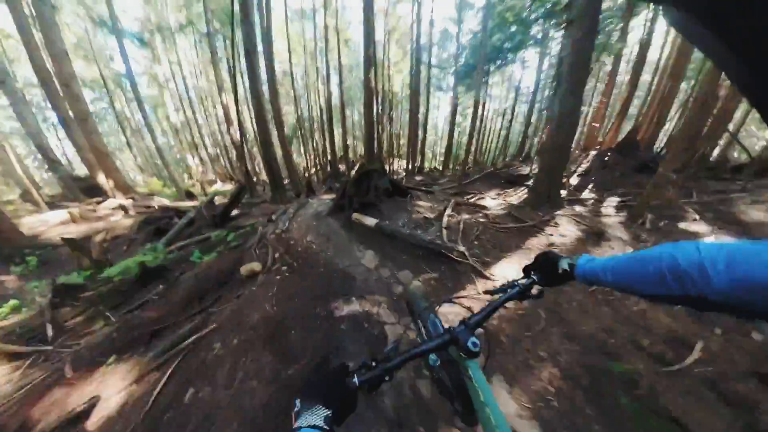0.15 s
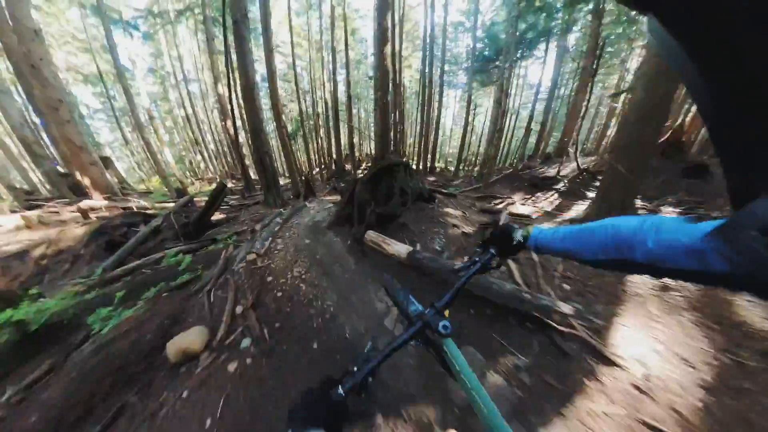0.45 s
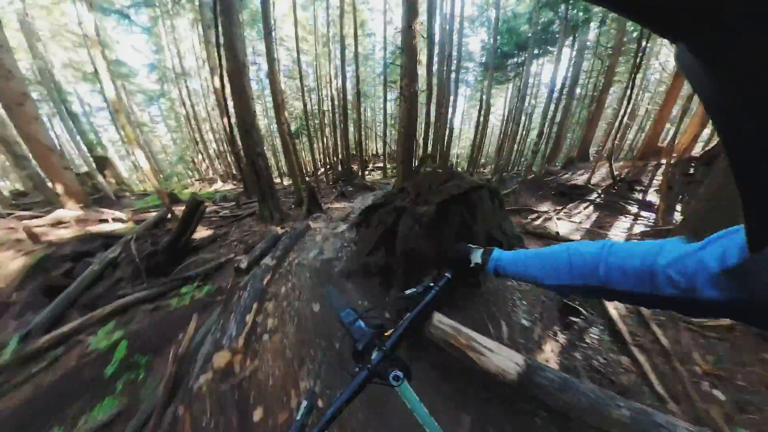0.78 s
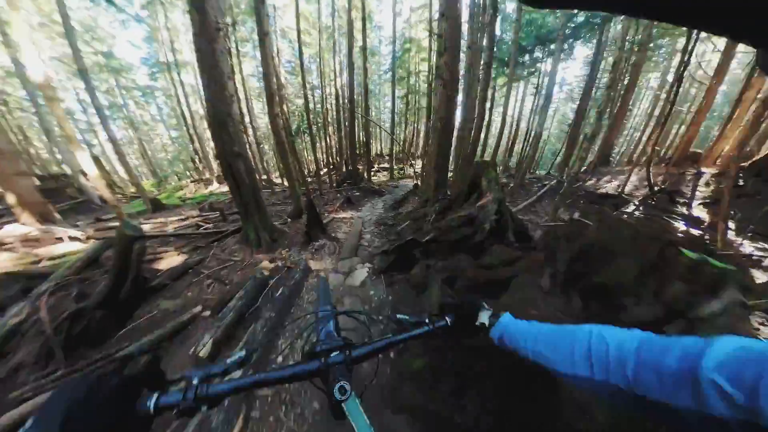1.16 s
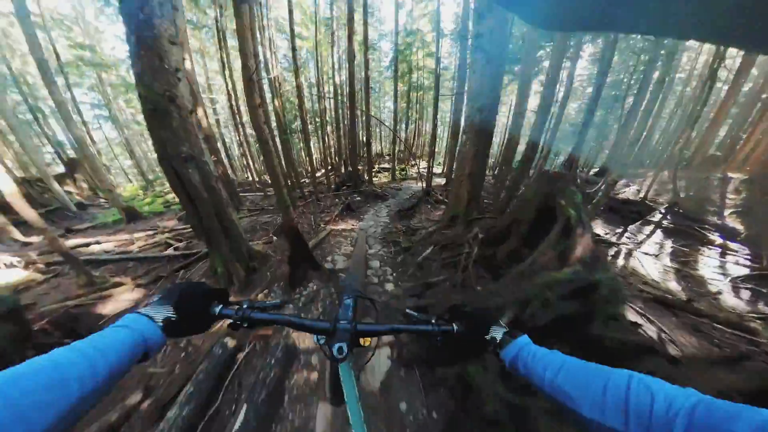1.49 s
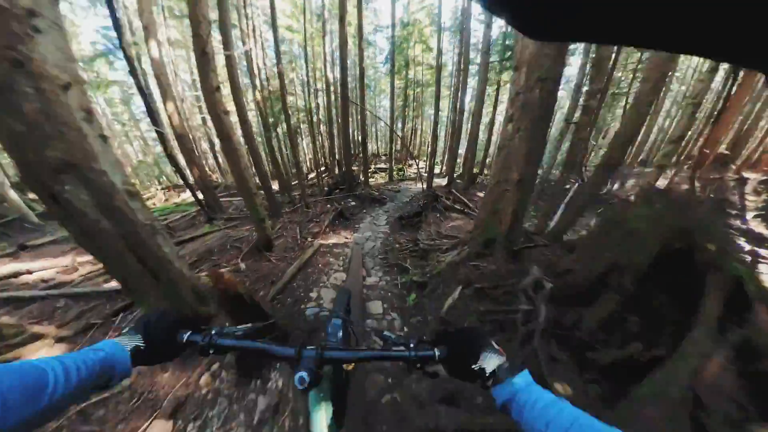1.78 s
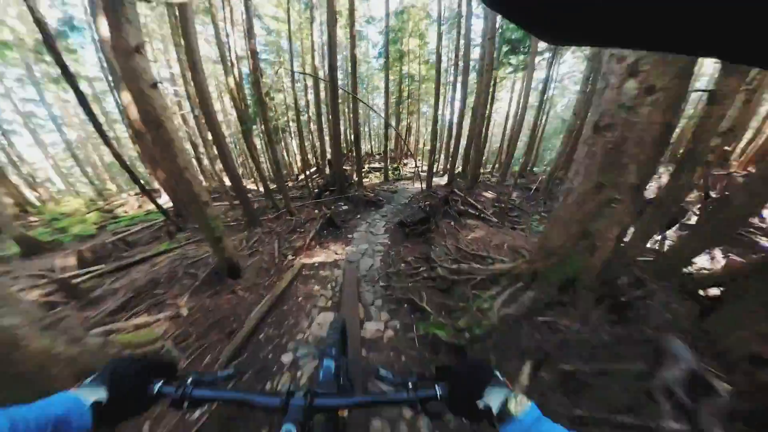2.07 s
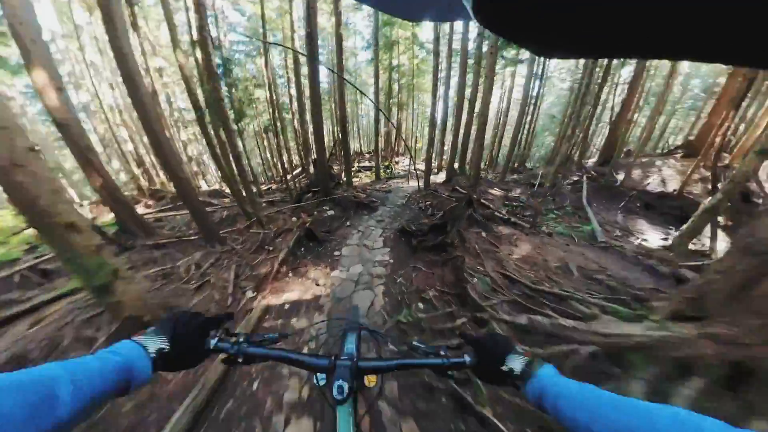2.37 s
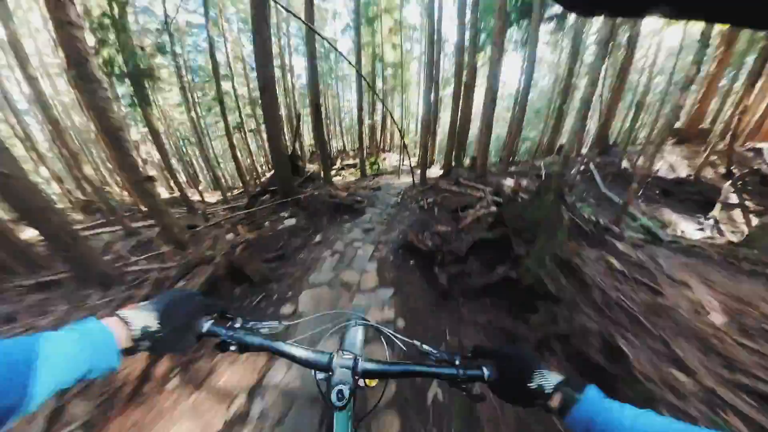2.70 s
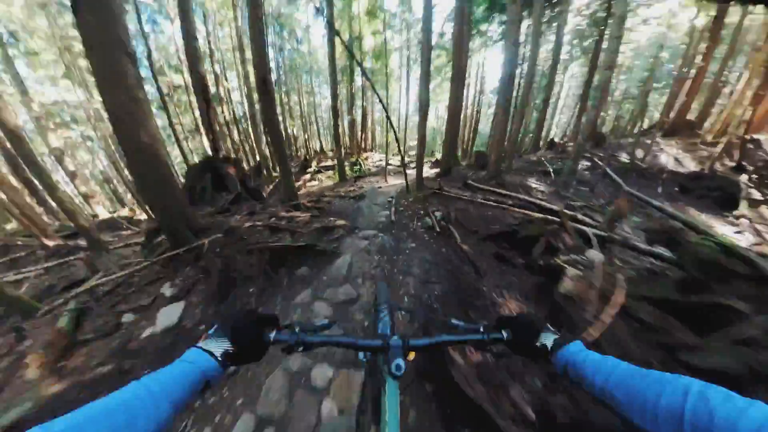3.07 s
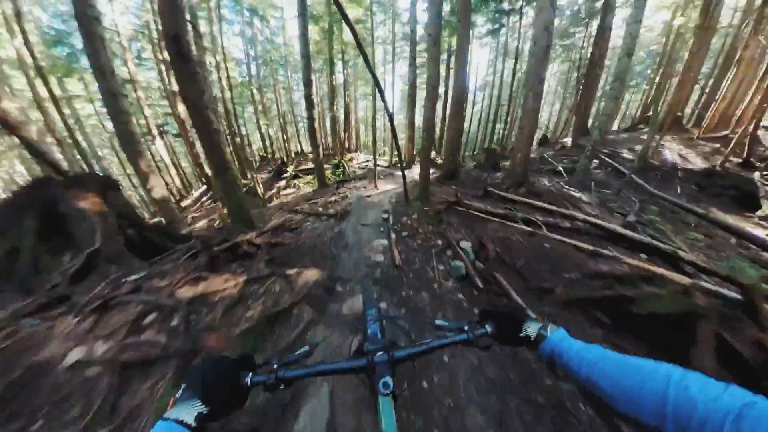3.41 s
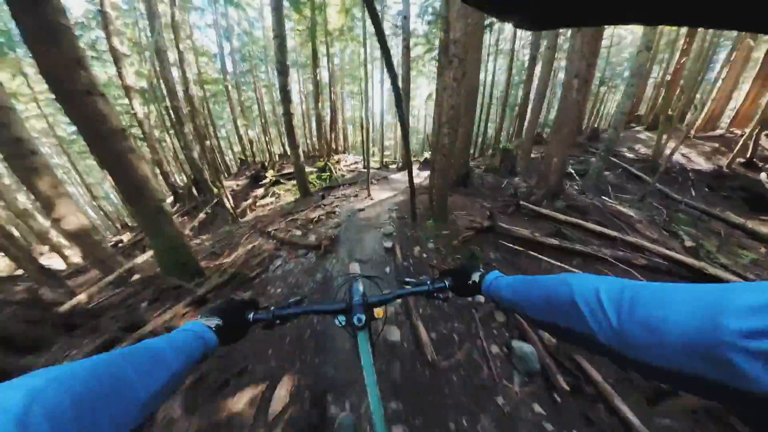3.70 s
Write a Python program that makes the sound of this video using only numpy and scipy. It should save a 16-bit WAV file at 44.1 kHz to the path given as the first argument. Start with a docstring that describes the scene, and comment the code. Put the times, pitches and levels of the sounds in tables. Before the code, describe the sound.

A mountain bike coasts down a rooty, stony forest trail, heard close from the rider's body. Lumpy low rumble, tyre drumming, gritty crunch and faint freehub sizzle run throughout. Until 0.7 s, dense knocks, chain slaps and deep thumps. Then sparse soft knocks, a stone clack near 1.1, a scrape at 1.4. From 2.6 knocks crowd back; hardest slaps and scrape at 3.2-3.45, then thinning to 3.85.

```python
"""A mountain bike coasts down a rooty, stony forest trail, heard from a camera worn by the rider.
Throughout: noise rumbles for wind and ground, random clicks drum and crunch the tyres and sizzle the freehub.
From the first moment to 0.7 s chain slaps and dense knocks ring the frame modes, and jolts thump the camera.
Then the trail eases: sparse knocks, softer thumps, a stone clack, a gravel scrape.
From 2.6 s knocks crowd in again, with hard chain slaps, clacks and scrapes near 3.4 s."""
import sys
import numpy as np
from scipy import signal
from scipy.fft import rfft, irfft, next_fast_len
from scipy.io import wavfile
from scipy.ndimage import uniform_filter1d

SR = 44100
rng = np.random.default_rng(int(sys.argv[2]) if len(sys.argv) > 2 else 0)


def bounce(signal):
    """Save signal as a 16-bit WAV file at the path given by the first command-line argument."""
    frames = np.transpose(np.atleast_2d(signal))
    limited = np.clip(frames, -1, 1)
    pcm = np.round(limited * 32767).astype(np.int16)
    wavfile.write(sys.argv[1], SR, pcm)


N = 169785
TIME = np.arange(N) / SR


def from_db(db):
    """Decibels to gain."""
    return 10 ** (np.asarray(db) / 20)


def rms_one(x):
    """Scale to unit rms."""
    return x / np.sqrt(np.mean(x ** 2) + 1e-20)


def level(rows, trim_db):
    """Gain over time from (s, dB) rows, joined in dB, plus a trim."""
    return from_db(np.interp(TIME, *np.transpose(rows)) + trim_db)


def band(x, edges_hz, kind="band"):
    """Butterworth filter."""
    return signal.sosfilt(signal.butter(3, edges_hz, kind, fs=SR, output="sos"), x)


def colour(x, points):
    """Minimum-phase filter through (Hz, dB) points, falling 60 dB per octave outside them."""
    size = 2 * next_fast_len(len(x))
    hz, db = np.transpose(points)
    octave = np.log2(np.arange(size // 2 + 1) * SR / size + 1)
    known = np.log2(hz)
    outside = np.abs(octave - np.clip(octave, known[0], known[-1]))
    curve_db = np.interp(octave, known, db) - 60 * outside
    # folding the cepstrum makes the filter causal
    cepstrum = irfft(np.log(from_db(np.maximum(curve_db, -100))))
    cepstrum[1:size // 2] *= 2
    cepstrum[size // 2 + 1:] = 0
    return irfft(rfft(x, size) * np.exp(rfft(cepstrum)))[:len(x)]


def drift(points_per_s):
    """Random normal points joined by straight lines."""
    return np.interp(TIME * points_per_s, np.arange(2048), rng.standard_normal(2048))


def grains(per_s, spread_db, size=N):
    """Random clicks of uneven strength and either sign."""
    strength = from_db(spread_db * np.minimum(rng.exponential(1, size), 4))
    return (rng.random(size) < per_s / SR) * strength * rng.choice([-1, 1], size)


def even(x, window_s):
    """Hold a texture near unit rms; the window smooths its power twice."""
    size = max(int(window_s * SR), 2)
    power = uniform_filter1d(uniform_filter1d(x * x, size), size)
    return x / np.sqrt(np.abs(power) + 1e-18)


def swell(s, half_s):
    """Gaussian rise and fall around a moment."""
    return np.exp(-((TIME - s) / half_s) ** 2 / 2)


# Wind and ground rumble. Each row: time in seconds, level in dB before trim.
RUMBLE_LEVEL = [(0.0, -26), (0.18, -20.5), (0.27, -25.5), (0.34, -18), (0.45, -24.5), (0.5, -20.5),
                (0.57, -32), (0.64, -17.5), (0.68, -26.5), (1.22, -24), (1.56, -36), (1.63, -22),
                (1.97, -32.5), (2.42, -28), (3.06, -19), (3.85, -29.5)]
# Rumble spectrum. Each row: frequency in Hz, relative level in dB.
RUMBLE_SPECTRUM = [(11, -35), (19, 3), (38, 1), (65, 8), (174, -11), (260, -16.5), (340, -43)]
RUMBLE_TRIM_DB = 1


def rumble():
    """Wind and ground shake the microphone: low noise in lumps."""
    noise = colour(rng.standard_normal(N), RUMBLE_SPECTRUM)
    return level(RUMBLE_LEVEL, RUMBLE_TRIM_DB) * even(noise, window_s=0.035)


# Freehub. Each row: time in seconds, level in dB before trim.
HUB_LEVEL = [(0.0, -50.5), (0.39, -52.5), (0.89, -51), (2.6, -48.5), (3.68, -49.5), (3.85, -47)]
# Sizzle, then wheel ring spectrum. Each row: frequency in Hz, relative level in dB.
HUB_SPECTRUM = [(2820, -73.5), (5060, -29), (5260, -24), (6080, -14.5), (6410, -6), (7270, 4), (8500, -9),
                (9050, -22.5), (9700, -62.5)]
HUB_BODY_SPECTRUM = [(530, -25), (900, -2), (1040, -14.5), (1230, -10), (1640, -3.5), (2570, -5.5),
                     (2940, -20), (3730, -20), (5000, -45.5)]
HUB_TRIM_DB, HUB_BODY_TRIM_DB = 1.5, -2.5
PAWL_HZ, PAWL_WANDER, PAWL_DEPTH, PAWL_DECAY_S = 151, 0.028, 0.19, 0.002
HUB_FLUTTER_DB, HUB_SWAY_DB = 1.5, 2


def freehub():
    """Pawls skate over the ratchet: a fine pulsing sizzle with a duller ring from the wheel."""
    teeth = np.cumsum(PAWL_HZ * (1 + PAWL_WANDER * drift(8.4))) / SR
    since_tooth_s = (teeth % 1) / PAWL_HZ
    pulse = 1 + PAWL_DEPTH * np.exp(-since_tooth_s / PAWL_DECAY_S)
    unsteady = from_db(HUB_FLUTTER_DB * drift(90) + HUB_SWAY_DB * drift(12))
    ticks = pulse * grains(3200, spread_db=-0.6) * unsteady
    sizzle = level(HUB_LEVEL, HUB_TRIM_DB) * rms_one(colour(ticks, HUB_SPECTRUM))
    ring = level(HUB_LEVEL, HUB_BODY_TRIM_DB) * rms_one(colour(ticks, HUB_BODY_SPECTRUM))
    return sizzle + ring


# Metal jingles. Each row: centre in seconds, Gaussian half length in seconds, level in dB.
JINGLE_EVENTS = [(0.027, 0.0036, -37), (0.331, 0.0046, -50), (2.987, 0.023, -50)]
# Jingle spectrum. Each row: frequency in Hz, relative level in dB.
JINGLE_SPECTRUM = [(2000, -19), (3300, 0), (4800, -20), (6200, -2), (7600, 4), (8500, -5), (9050, -22),
                   (9700, -59.5)]


def jingles():
    """Chain links and cables rattle: bright coloured clicks in short swells."""
    metal = rms_one(colour(grains(3300, spread_db=0), JINGLE_SPECTRUM))
    return metal * sum(from_db(db) * swell(s, half_s) for s, half_s, db in JINGLE_EVENTS)


# Gravel scrapes under a tyre. Each row: centre in seconds, Gaussian half length in seconds,
# level in dB, band centre in Hz, band width in octaves.
SCRAPE_EVENTS = [(0.373, 0.0049, -26.5, 2390, 0.5), (0.474, 0.012, -36.5, 2110, 0.7),
                 (1.443, 0.06, -38.5, 590, 1.6), (3.442, 0.015, -23, 730, 0.48),
                 (3.438, 0.0086, -29, 1870, 0.49), (3.578, 0.022, -35, 940, 1.75),
                 (3.85, 0.02, -32, 1120, 0.38)]


def scrapes():
    """Each slide over gravel rasps in a band of its own."""
    out = np.zeros(N)
    for s, half_s, db, hz, octaves in SCRAPE_EVENTS:
        edges_hz = hz * 2 ** (octaves * np.array([-0.5, 0.5]))
        rasp = even(band(grains(1500, spread_db=1.5), edges_hz), window_s=0.016)
        out += from_db(db) * swell(s, half_s) * rasp
    return out


# Grit and pebble spectrum. Each row: frequency in Hz, relative level in dB.
GRIT_SPECTRUM = [(260, -9.5), (450, -1.5), (721, -9), (960, -10), (1250, -8.5), (1870, -19), (2700, -22),
                 (4510, -45), (6760, -85)]
PEBBLES_PER_S, PEBBLE_T60_CYCLES = 130, 29


def pebbles():
    """Loose stones click at random, each ringing briefly at one of 40 pitches."""
    out = np.zeros(N)
    pitches_hz = np.geomspace(450, 3300, 40)
    for hz in pitches_hz:
        r = from_db(-60 * hz / (PEBBLE_T60_CYCLES * SR))
        w = 2 * np.pi * hz / SR
        clicks = grains(PEBBLES_PER_S / len(pitches_hz), spread_db=2) + 1e-18
        out += hz * signal.lfilter([0, np.sin(w)], [1, -2 * r * np.cos(w), r * r], clicks)
    return rms_one(colour(out, GRIT_SPECTRUM))


# Tyre drumming, then grit crunch. Each row: time in seconds, level in dB before trim and bumps.
DRUM_LEVEL = [(0.0, -26), (0.17, -24), (0.45, -29.5), (0.48, -17.5), (0.57, -30.5), (0.92, -31),
              (1.13, -38.5), (1.35, -35.5), (1.4, -24), (1.55, -42), (1.7, -30.5), (1.9, -37.5),
              (2.62, -33), (2.71, -20), (2.85, -28), (3.28, -27), (3.85, -31)]
GRIT_LEVEL = [(0.0, -39.5), (0.55, -36), (0.78, -47), (1.06, -38.5), (1.14, -42.5), (1.39, -36.5),
              (1.51, -42), (1.62, -44.5), (1.84, -48.5), (2.6, -44), (2.95, -35.5), (3.06, -43),
              (3.3, -36.5), (3.68, -41), (3.85, -57)]
# Drumming spectrum. Each row: frequency in Hz, relative level in dB.
DRUM_SPECTRUM = [(76, -6.5), (130, 3.5), (225, -3), (285, 3), (350, -5.5), (585, -11.5), (750, -15),
                 (980, -43)]
DRUM_TRIM_DB, GRIT_TRIM_DB = -3.5, 0.5
BUMP_DB, PEBBLE_TO_DIRT_DB = 1.98, -2.5


def tyres():
    """Small stones drum the tyres, grit and pebbles crunch; both swell together over bumps."""
    bumps_db = BUMP_DB * drift(35.39)
    drum = even(colour(grains(260, spread_db=1.5), DRUM_SPECTRUM), window_s=0.11)
    dirt = rms_one(colour(grains(750, spread_db=0.5), GRIT_SPECTRUM))
    grit = even(dirt + from_db(PEBBLE_TO_DIRT_DB) * pebbles(), window_s=0.1)
    drumming = level(DRUM_LEVEL, DRUM_TRIM_DB + bumps_db) * drum
    crunch = level(GRIT_LEVEL, GRIT_TRIM_DB + bumps_db) * grit
    return drumming, crunch


# Brief treble dips. Each row: centre in seconds, half length in seconds, depth in dB.
DIP_EVENTS = [(0.178, 0.017, 9.5), (0.304, 0.011, 9), (0.356, 0.011, 13), (0.514, 0.012, 15)]


def treble_dips():
    """Gain of the bright sounds, which sink for a moment and return."""
    depth_db = sum(db * np.exp(-((TIME - s) / half_s) ** 4) for s, half_s, db in DIP_EVENTS)
    return from_db(-depth_db)


# Kicked stones. Each row: start in seconds, envelope peak in dB, pitch in Hz.
CLACK_EVENTS = [(0.134, -16.5, 617), (1.081, -22, 633), (2.862, -20, 720), (3.241, -16, 965)]
CLACK_PEAK_S = 0.0013


def clacks():
    """A kicked stone gives one hollow note that dies at once."""
    out = np.zeros(N)
    for s, db, hz in CLACK_EVENTS:
        age_s = np.maximum(TIME - s, 0)
        age = age_s / CLACK_PEAK_S
        out += from_db(db) * age * np.exp(1 - age) * np.sin(2 * np.pi * hz * age_s)
    return out


# Jolts that reach the camera. Each row: start in seconds, envelope peak in dB before trim, pitch in Hz.
THUMP_EVENTS = [(0.139, -13, 50), (0.147, -16.5, 124), (0.158, -16, 46.7), (0.337, -10.5, 60.6),
                (0.495, -8, 68.5), (0.622, -15.5, 65.4), (0.726, -21, 109), (0.758, -14, 123),
                (0.888, -13.5, 68.6), (1.046, -16.5, 85), (1.15, -18.5, 91), (1.22, -17.5, 72.5),
                (1.615, -15, 65.4), (1.69, -19, 106), (1.767, -18.5, 65), (1.802, -15.5, 70),
                (2.26, -19, 86), (2.318, -15.5, 87), (2.784, -12.5, 53.7), (2.917, -20, 65),
                (3.024, -12, 51.3), (3.29, -12.5, 70), (3.312, -10.5, 136), (3.582, -15, 60)]
THUMP_PEAK_CYCLES, THUMP_TRIM_DB = 0.48, 2.5


def thumps():
    """A jolt swings the camera for a cycle or two."""
    out = np.zeros(N)
    for s, db, hz in THUMP_EVENTS:
        cycles = np.maximum(TIME - s, 0) * hz
        age = cycles / THUMP_PEAK_CYCLES
        envelope = age ** 2 * np.exp(2 * (1 - age))
        out -= from_db(db + THUMP_TRIM_DB) * envelope * np.sin(2 * np.pi * cycles)
    return out


# Modes of frame, bars and wheels, before scatter. Each row: pitch in Hz, relative level in dB, t60 in seconds.
FRAME_MODES = [(191.7, 9.5, 0.038), (266, -2, 0.11), (587.6, -9.5, 0.12), (827, -5, 0.057),
               (986, -1.5, 0.088), (1144, -3, 0.052), (1575, 0, 0.055), (1880, -5.5, 0.044),
               (2210, 2, 0.034), (2900, -9, 0.05)]
PITCH_SCATTER, MODE_SCATTER_DB, CRACK_DB = 0.028, 2, 42


def frame(clicks):
    """Contacts crack and ring the bike; each call scatters mode pitches and strengths."""
    out = from_db(CRACK_DB) * clicks
    for hz, db, t60_s in FRAME_MODES:
        r = from_db(-60 / (t60_s * SR))
        w = 2 * np.pi * hz * (1 + PITCH_SCATTER * rng.normal()) / SR
        ring = signal.lfilter([1, -r * np.cos(w)], [1, -2 * r * np.cos(w), r * r], clicks)
        out = out + from_db(db + MODE_SCATTER_DB * rng.normal()) * ring
    return out


# How the frame passes on a blow. Each row: frequency in Hz, relative level in dB.
BLOW_SPECTRUM = [(100, -9), (280, 4.5), (600, 0.5), (1200, -10.5), (2400, -18.5), (3200, -26.5),
                 (4000, -40), (4800, -57.5), (6000, -36), (7300, -30.5), (8500, -35.5), (9600, -67.5)]
RATTLES_PER_S, RATTLE_TRIM_DB, RATTLE_LOW_HZ = 120, -18, 460


def rattle():
    """Small stones keep the bike chattering, the more so the harder the tyres drum."""
    chatter = colour(frame(grains(RATTLES_PER_S, spread_db=0.0)), BLOW_SPECTRUM)
    steady = even(band(chatter, RATTLE_LOW_HZ, "high"), window_s=0.18)
    return level(DRUM_LEVEL, RATTLE_TRIM_DB) * steady


# Middle, bass and treble of a blow. Each row: low edge in Hz, high edge in Hz.
BLOW_EDGES_HZ = [(500, 1500), (140, 500), (1500, 9000)]
CONTACTS_PER_S, ATTACK_S, TAIL_S, TAIL_DB = 1400, 0.00278, 0.034, -10.5


def blows(rows, trims_db, length_s):
    """Each blow is a quick clatter of contacts with a weak after-rattle, levelled in three bands."""
    size = SR // 6
    out = np.zeros(N + SR)
    t = np.arange(size) / SR
    decay = np.exp(-(t / length_s) ** 2) + from_db(TAIL_DB) * np.exp(-t / TAIL_S)
    shape = np.minimum(t / ATTACK_S, 1) * decay
    for s, *levels_db in rows:
        contacts = shape * grains(CONTACTS_PER_S, spread_db=1.5, size=size)
        sound = colour(frame(contacts), BLOW_SPECTRUM)
        start = max(int((s - ATTACK_S / 2) * SR), 0)
        for edges_hz, db, trim_db in zip(BLOW_EDGES_HZ, levels_db, trims_db):
            part = band(sound, edges_hz)
            loudest = np.sqrt(uniform_filter1d(part ** 2, size=SR // 50).max())  # 20 ms rms
            out[start:start + size] += from_db(db + trim_db) * part / loudest
    return out[:N]


# Chain slaps. Each row: time in seconds, then peak level before trim of middle, bass and treble in dB.
SLAP_EVENTS = [(0.023, -21.5, -30, -28.5), (0.366, -21.5, -17, -27.5), (0.462, -17, -18, -28),
               (3.241, -10.5, -17.5, -24.5), (3.42, -9.5, -25, -31), (3.431, -9, -19.5, -32)]


def chain_slaps():
    """The chain slaps the frame, which rings."""
    return blows(SLAP_EVENTS, trims_db=[-9.5, -10.5, -4], length_s=0.015)


# Root and stone knocks. Each row: time in seconds, then peak level before trim of middle, bass and treble in dB.
KNOCK_EVENTS = [(0.092, -18.5, -23.5, -32.5), (0.207, -9.5, -18.5, -31), (0.243, -16, -19, -38),
                (0.32, -15.5, -24, -45), (0.338, -15.5, -20, -40), (0.431, -20, -26.5, -45),
                (0.472, -11.5, -17.5, -29), (0.489, -15, -14.5, -41), (0.533, -16.5, -36, -32),
                (0.582, -17, -26, -36), (0.643, -23.5, -26, -48), (0.728, -29, -24, -48),
                (0.829, -27.5, -27, -48), (0.912, -28.5, -22, -38), (1.375, -28, -25, -36),
                (1.494, -20, -29, -42.5), (1.739, -31, -26.5, -50), (2.005, -26, -24.5, -57),
                (2.185, -25.5, -33.5, -51), (2.264, -29, -27.5, -52), (2.319, -43, -26.5, -60),
                (2.644, -21.5, -21.5, -55), (2.703, -12, -24.5, -39), (2.807, -23, -22.5, -40),
                (2.872, -15, -18.5, -39), (2.918, -18, -17.5, -39), (2.947, -15.5, -19, -35.5),
                (2.974, -17.5, -26.5, -37.5), (3.018, -16, -19, -40), (3.111, -10, -14, -35),
                (3.162, -14, -19.5, -43), (3.179, -15.5, -18, -35.5), (3.297, -17.5, -20, -36.5),
                (3.315, -22.5, -17.5, -42), (3.376, -18.5, -34, -44), (3.465, -14, -28, -34.5),
                (3.638, -20, -24, -38), (3.705, -29, -17, -48), (3.75, -25.5, -28.5, -56)]


def knocks():
    """Roots and stones knock the bike, which rings."""
    return blows(KNOCK_EVENTS, trims_db=[-13, -4, -4], length_s=0.012)


def scene():
    """Everything as it reaches the rider's camera."""
    drum, grit = tyres()
    hits = knocks() + chain_slaps() + clacks()
    bright = (grit + rattle() + freehub()) * treble_dips() + scrapes() + jingles()
    return (rumble() + thumps() + drum + hits + bright)[None]


OVERLOAD, CUTOFF_HZ = 0.78, 15800  # ceiling in full scale; stopband edge


def record(dry):
    """The largest swings are rounded off and the top is cut."""
    rounded = dry / (1 + (dry / OVERLOAD) ** 10) ** (1 / 10)
    return signal.sosfilt(signal.cheby2(12, 70, CUTOFF_HZ, fs=SR, output="sos"), rounded)


dry = scene()
out = record(dry)
bounce(out)
```